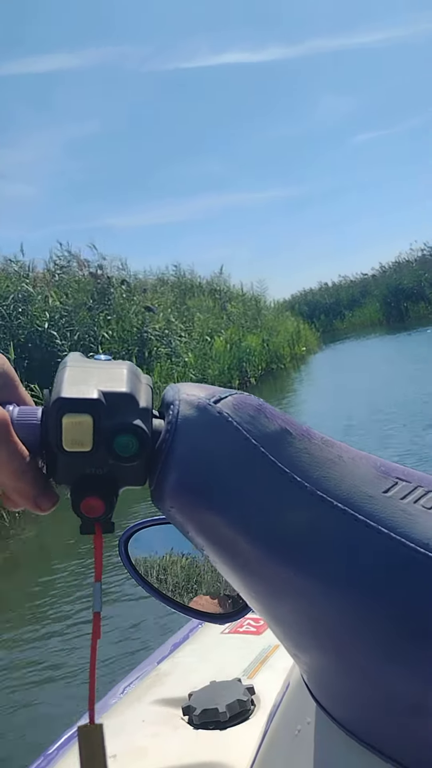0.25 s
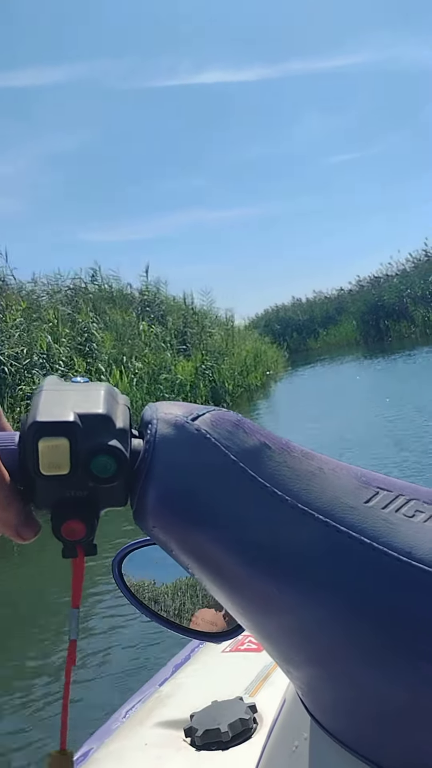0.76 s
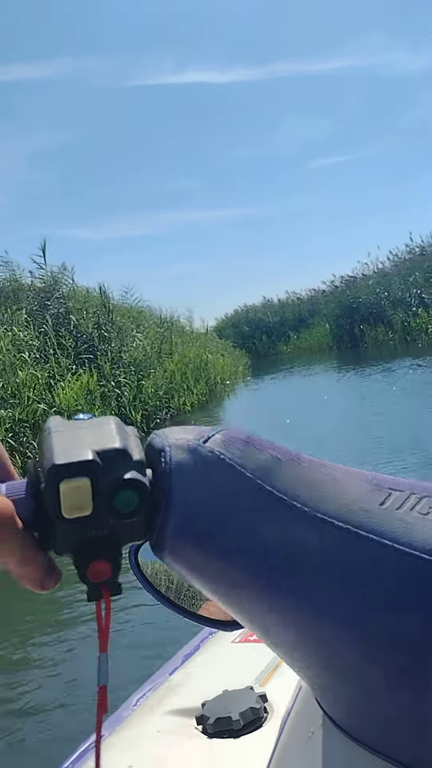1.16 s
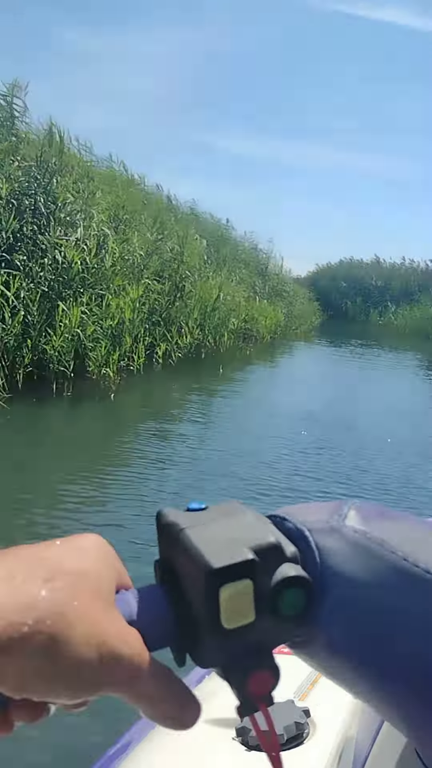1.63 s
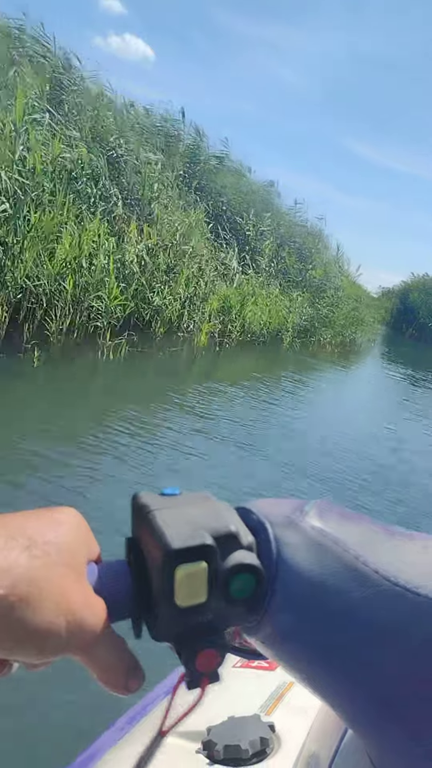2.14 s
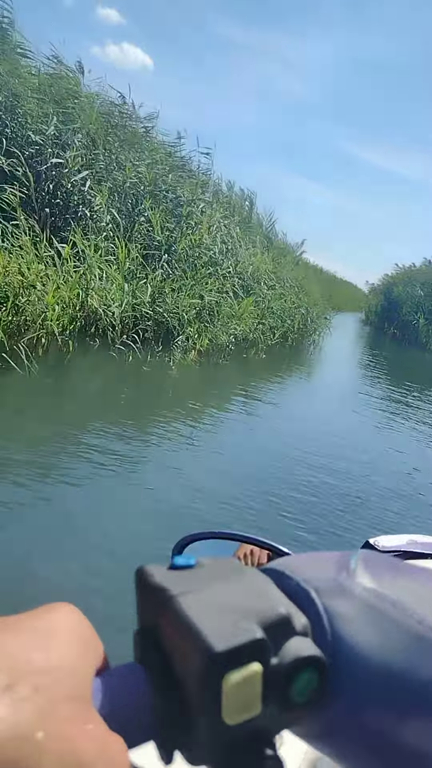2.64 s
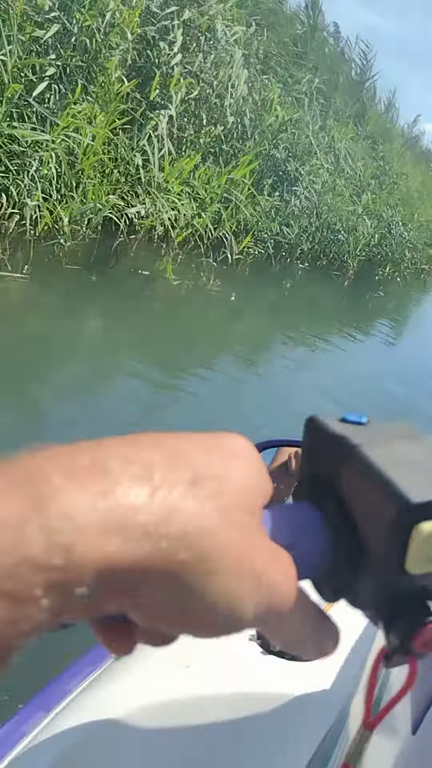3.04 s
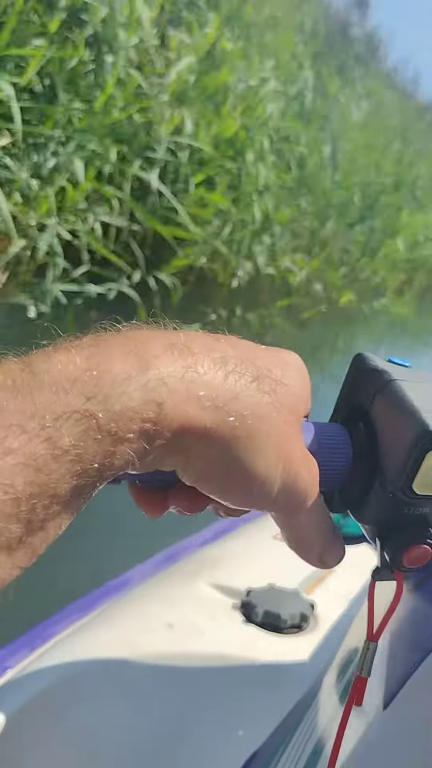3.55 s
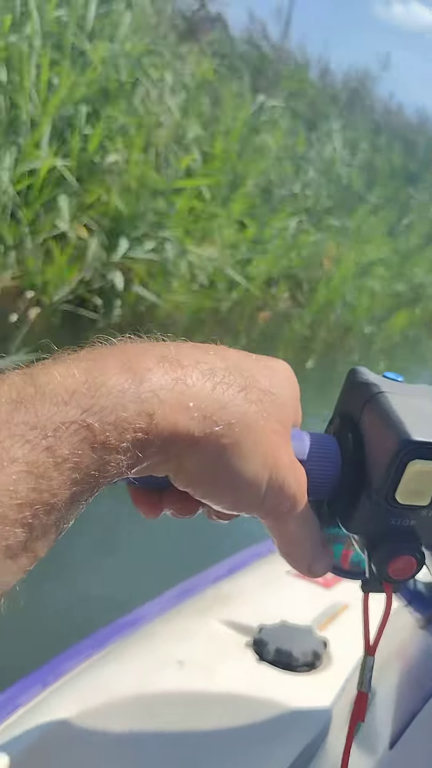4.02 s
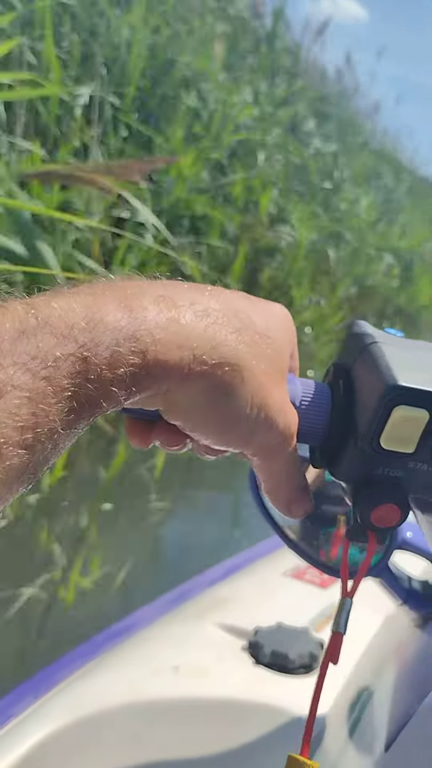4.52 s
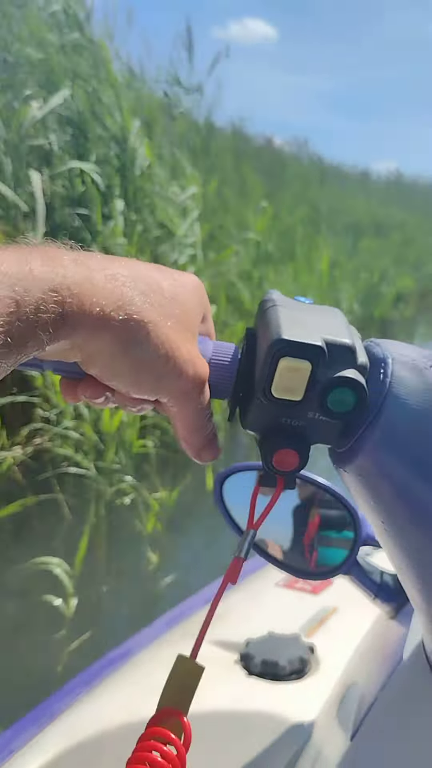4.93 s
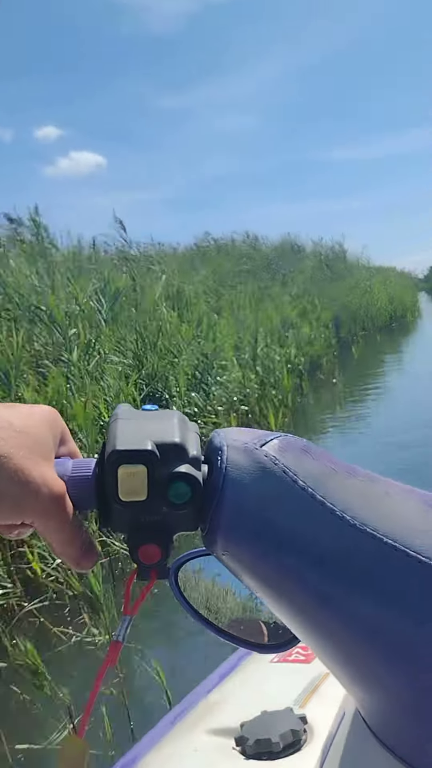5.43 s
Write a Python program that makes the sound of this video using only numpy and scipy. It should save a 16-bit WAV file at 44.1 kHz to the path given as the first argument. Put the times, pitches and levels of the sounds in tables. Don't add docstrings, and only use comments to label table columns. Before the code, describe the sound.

Close on board a small two-stroke jet boat, the engine drones low, jumps to a raspy higher note, sags, then surges again and stays high. Low air thumps buffet the hull, water spray builds in the second half, and faint ticks hit the deck near the end. Open marsh, hand-held stereo microphone, brighter and mostly louder on the right.

```python
import sys
import numpy as np
from scipy import signal
from scipy.fft import rfft, irfft, next_fast_len
from scipy.io import wavfile
from scipy.ndimage import uniform_filter1d

SR = 44100
rng = np.random.default_rng(int(sys.argv[2]) if len(sys.argv) > 2 else 0)


def to_wav(sig):
    pcm = np.clip(np.atleast_2d(sig), -1, 1) * 32767
    pcm = np.round(pcm).astype(np.int16)
    wavfile.write(sys.argv[1], SR, pcm.T)


def makeup_ratio(level_db):
    decades = np.asarray(level_db, float) / 20
    return 10 ** decades


N = 250488


def at_hz(points, hz, column=1):
    points = np.array(points)
    return np.interp(np.log(np.maximum(hz, 1)), np.log(points[:, 0]), points[:, column])


def in_time(rows):
    s, *columns = np.transpose(rows)
    return [np.interp(np.arange(N) / SR, s, c) for c in columns]


def bumps(rows, width_s):
    s, *columns = np.transpose(rows)
    bells = np.exp(-((np.arange(0, N, 64) / SR - s[:, None]) / width_s) ** 2)
    return [np.interp(np.arange(N) / 64, np.arange(bells.shape[1]), c @ bells) for c in columns]


def rms_one(x):
    return x / np.sqrt(np.mean(x ** 2) + 1e-20)


def drift(rate_hz):
    r = np.exp(-2 * np.pi * rate_hz * 40 / SR)
    noise = rng.standard_normal(N // 40 + 2002)
    slow = signal.lfilter([1], [1, -2 * r, r * r], noise)[2000:]
    slow = rms_one(slow - slow.mean())
    return np.interp(np.arange(N) / 40, np.arange(len(slow)), slow)


def coloured(x, spectrum):
    size = next_fast_len(N + SR // 2)
    hz = np.arange(size // 2 + 1) * SR / size
    octaves_below = np.log2(spectrum[0][0] / np.maximum(hz, 1))
    octaves_above = np.log2(np.maximum(hz, 1) / spectrum[-1][0])
    outside = np.maximum(np.maximum(octaves_below, octaves_above), 0)
    gain = makeup_ratio(at_hz(spectrum, hz) - 40 * outside)
    return rms_one(irfft(rfft(x, size) * gain, size)[:, :N])


def resonance(x, hz, width_hz):
    r = np.exp(-np.pi * width_hz / SR)
    top = np.array([1, 0, -1]) * (1 - r * r) / 2
    return signal.lfilter(top, [1, -2 * r * np.cos(2 * np.pi * hz / SR), r * r], x)


def rattle(shake, modes, patchy_db):
    rings = 0
    for hz, width_hz, db in modes:
        ring = resonance(resonance(shake, hz, 1.7 * width_hz), hz, 1.7 * width_hz)
        rings = rings + makeup_ratio(db + patchy_db * drift(12)) * ring
    return rms_one(rings)


def gated(turn, depth, patchy_db):
    uneven_turn = turn + 0.28 * drift(18)
    gate = np.exp(depth * np.cos(uneven_turn)) * makeup_ratio(patchy_db * drift(16))
    return gate * rng.standard_normal((2, N))


def grains(spread_db, patchy_db):
    size_db = spread_db * np.minimum(rng.exponential(1, N), 5)
    return makeup_ratio(size_db + patchy_db * drift(32)) * rng.standard_normal((2, N))


def shaft_speed():
    # (time [s], speed [turns/s])
    throttle = [(0.0, 64.9), (0.39, 65.9), (0.955, 71.1), (1.04, 74.8), (1.31, 103.4), (1.45, 106.5),
                (1.675, 107.1), (2.1, 84.9), (2.625, 72.7), (2.835, 104.6), (2.96, 107.3), (3.385, 108.5),
                (3.605, 101.1), (3.905, 96.2), (4.455, 96.6), (4.81, 91.2), (4.965, 109.3), (5.68, 110.9)]
    # (time [s], speed gained [turns/s])
    slips = [
        (.62, .5),
        (1.82, -1.1),
        (1.94, 1),
        (2.62, .8),
        (2.72, -1.5),
        (2.8, .9),
        (4.65, -.6),
        (4.97, -.8),
    ]
    inertia_s = .05
    smooth = uniform_filter1d(in_time(throttle)[0], size=int(inertia_s * SR), mode="nearest")
    return smooth + bumps(slips, .045)[0]


def hull_db(hz):
    # (pitch [Hz], width [Hz], level [dB])
    resonances = [(70, 71, 2), (278.3, 31, 4.5), (396.4, 76, 5), (463.2, 33, 1.5), (510.6, 75, -2),
                  (647.5, 43, -13.5), (719.8, 48, -10), (869, 18, -10), (920, 40, -6), (1125, 10, -11.5),
                  (1267, 100, -11.5), (1487, 160, -18.5), (2150, 81, -8.5), (2290, 80, -16.5)]
    power = 0.0057
    for top, width_hz, db in resonances:
        power = power + makeup_ratio(2 * db) / (1 + (2 * (hz - top) / width_hz) ** 2) ** 2
    return 10 * np.log10(power)


def drone(speed, turn):
    # (time [s], level [dB])
    effort = [(0, 1), (.6, -1), (1.1, -1.5), (1.45, 1), (1.75, -0.5), (1.95, 2.5), (2.4, 1), (2.75, -1),
              (2.9, 1), (3.4, 0), (3.55, -1.5), (3.8, -0.5), (4.5, 0.5), (4.8, 0), (5.3, 0), (5.68, -1)]
    # (speed [turns/s], order 2 [dB], order 3 [dB], order 4 gain [dB],
    # order 5 [dB], other orders [dB])
    by_speed = [(69, -35.5, -18.5, 2, -48, -35.5), (67.4, -40.5, -23.5, 1, -50.5, -39.5),
                (68.6, -32.5, -26, 6, -37, -33), (72.6, -29, -28.5, 3.5, -38, -31.5),
                (79.8, -33.5, -21, 4, -26.5, -32.5), (85.8, -35, -16, 4.5, -33, -32.5),
                (100.4, -23.5, -14.5, 3, -33.5, -33), (96.8, -25.5, -15, -8.5, -40, -29),
                (106.8, -23.5, -15, 5.5, -26.5, -30), (106.5, -24.5, -16, -7.5, -31, -33.5),
                (112.2, -17.5, -21, -7, -30.5, -24)]
    # (order [number], level [dB])
    pattern = [(1, 3.5), (4, -2), (6, 4), (7, 5.5), (8, 2), (9, -0.5), (10, 3), (11, 2), (12, -1.5),
               (13, -2), (14, 1), (15, -6.5), (16, 0), (17, -0.5), (18, -6.5), (19, -4.5), (20, -2),
               (21, -6.5), (22, -5.5)]
    # (order [number], start [s], end [s])
    swells = [(1, 1.1, 1.5), (1, 2.78, 3.06), (2, 2.8, 3.9), (5, 3.5, 4.85), (8, -1, .6), (7, 1.12, 1.9),
              (11, 1.95, 2.3), (8, 1.25, 1.72), (8, 1.9, 2.5), (8, 2.8, 3.4), (9, 4.85, 7), (10, -1, .52),
              (10, .54, 1.05), (10, 1.15, 1.29), (4, 1.3, 1.56), (10, 2.3, 2.75), (10, 4.9, 7),
              (11, -1, .66), (7, 1.98, 2.4), (11, 1.05, 1.21), (11, 1.3, 1.8), (2, 1.72, 1.95),
              (12, 1.26, 1.62), (13, .68, 1.05), (14, 1.68, 2.0), (14, 3.37, 3.75), (14, 3.7, 4.6),
              (15, 3.4, 5.0), (17, 1.6, 4.9), (21, .6, 1.05)]
    swells_db = [-13, 6, -7, -2.5, 1.5, -4.5, -7.5, 8.5, -9.5, 4.5, 9.5, -14, 9, 12.5, -10, 7.5, 7.5, 10.5,
                 3.5, 5.5, 8.5, -8, 7.5, 7.5, 9.5, 13.5, 9, 12, 4, 12]
    t, step = np.arange(N) / SR, 64
    effort_db = in_time(effort)[0]
    turns, *columns = np.transpose(by_speed)
    second_db, third_db, fourth_db, fifth_db, rest_db = [np.interp(speed, turns, c) for c in columns]
    quickening = np.gradient(np.log2(speed)) * SR
    rest_db = rest_db + effort_db + 0.5 * quickening
    levels_db = {2: effort_db + second_db, 3: effort_db + third_db}
    levels_db[5] = effort_db + fifth_db + 2.5 * quickening + 0.87 * drift(16)
    for k, db in pattern:
        through_hull_db = np.repeat(hull_db(k * speed[::step]), step)[:N]
        levels_db[k] = rest_db + db + through_hull_db + 1.1 * drift(15)
    levels_db[4] += fourth_db
    for (k, start, end), db in zip(swells, swells_db):
        fade = np.clip(np.minimum(t - start, end - t) / .08, 0, 1)
        levels_db[k] = levels_db[k] + db * fade
    waver, out = .018 * drift(20), np.zeros(N)
    for k, level_db in levels_db.items():
        gain = uniform_filter1d(makeup_ratio(level_db + .7 * drift(21)), size=256)
        delay = -.2 * k * k + .1 * rng.uniform(0, 2 * np.pi)
        out += np.sqrt(2) * gain * np.cos(k * (turn + waver + 2) + delay)
    return out


def engine_noise_levels(octaves):
    # (time [s], roar [dB], rasp [dB], rattle [dB])
    snaps = [
        (1.17, 2.5, 6, 1),
        (1.72, -1, 7, 1),
        (2.2, 3, 4.5, 1),
        (2.78, 4, 6.5, 0.5),
        (3.469, 0, 0.5, 4.5),
        (4.3, 0, 3, 3.5),
        (4.62, -2, 4, 2),
        (4.94, 1, 5.5, 1),
    ]
    t = np.arange(N) / SR
    fall = 0.22 * t
    held = np.maximum.accumulate(octaves + fall) - fall
    roar_snap_db, rasp_snap_db, rattle_snap_db = bumps(snaps, .12)
    roar_db = -39 + 3.34 * held + 0.67 * t + roar_snap_db
    rasp_db = -46 + 13.1 * held + 0.62 * t + rasp_snap_db
    rattle_db = -47 + 11.3 * held + 0.18 * t + rattle_snap_db
    return roar_db, rasp_db, rattle_db


def exhaust_roar(turn, level_db):
    # (pitch [Hz], level per Hz [dB])
    roar_tone = [(82, -43), (140, -3), (203, -8), (263, -6), (311, -8.5), (341, -9), (471, -7.5),
                 (614, -19.5), (893, -14.5), (1020, -17.5), (1330, -56.5), (2240, -120)]
    return makeup_ratio(level_db + 6) * coloured(gated(turn, depth=0.08, patchy_db=1.94), roar_tone)


def intake_rasp(turn, level_db):
    # (pitch [Hz], width [Hz], level [dB])
    box_modes = [(1178, 160, 1), (1348, 148, 0.5), (1602, 180, -7.5)]
    return makeup_ratio(level_db - 2) * rattle(gated(turn, depth=0.3, patchy_db=0.94), box_modes, patchy_db=2.04)


def casing_rattle(turn, level_db):
    # (pitch [Hz], width [Hz], level [dB])
    casing_modes = [(2106, 100, 0.5), (2216, 230, -5)]
    return makeup_ratio(level_db - 0.6) * rattle(gated(turn, depth=0.23, patchy_db=0.6), casing_modes, patchy_db=0.6)


def jet_pump(turn, octaves):
    # (pitch [Hz], width [Hz], level [dB])
    pump_modes = [(4620, 180, 2.5), (5600, 250, -5)]
    hiss = rattle(gated(turn, depth=0.16, patchy_db=0.9), pump_modes, patchy_db=-1.5)
    return makeup_ratio(-79.5 + 30.5 * octaves) * hiss


def air_rumble():
    # (time [s], level [dB])
    buffet = [(0, -25.5), (.45, -35), (.95, -26.5), (1.15, -38.5), (1.42, -29.5), (1.9, -22), (2.5, -15),
              (2.72, -19.5), (2.98, -24.5), (3.1, -15), (3.55, -16), (4.2, -17.5), (4.6, -27), (4.75, -21),
              (5.2, -18), (5.68, -15.5)]
    # (time [s], level [dB])
    brief_swells = [(.2, 3.5), (.98, 9.5), (1.06, 7.5), (1.85, 4), (2.34, 1), (2.4, -5.5), (2.59, 6.5), (3.29, 2),
                    (3.42, -6), (3.54, 3), (4.05, 4.5), (4.18, 2), (4.33, -8), (4.73, 8.5), (4.81, -5.5),
                    (5.02, 6.5), (5.47, 2), (5.6, -9)]
    # (pitch [Hz], level per Hz [dB])
    rumble_tone = [(12, -44), (20, -13), (70, 9), (106, 4.5), (162, -13.5), (190, -28), (250, -47.5),
                   (420, -120)]
    level_db = in_time(buffet)[0] + bumps(brief_swells, 0.021)[0]
    return makeup_ratio(level_db) * coloured(rng.standard_normal((2, N)), rumble_tone)


def water_levels():
    # (time [s], wash level [dB])
    thrown = [(0, -60.5), (.5, -56), (1.1, -58), (1.65, -50.5), (2.07, -40.5), (2.36, -50), (2.5, -49.5),
              (2.8, -49.5), (3.26, -42), (3.9, -41), (4.4, -39), (4.7, -36), (5.3, -36.5), (5.68, -40)]
    # (time [s], level [dB])
    splashes = [(2.33, 9), (2.95, 1.5), (3.29, 3.5), (3.95, 5.5), (4.14, 3.5), (4.41, 4.5), (4.66, 0.5),
                (4.97, 3.5), (5.15, 4), (5.26, 4), (5.44, 4), (5.55, 2.5)]
    return in_time(thrown)[0], bumps(splashes, 0.044)[0]


def footwell_wash(wash_db, splash_db):
    # (pitch [Hz], width [Hz], level [dB])
    footwell_modes = [(2880, 270, 2), (2920, 230, -8), (2606, 240, -5)]
    ring = rattle(grains(spread_db=1.5, patchy_db=-0.53), footwell_modes, patchy_db=-4.4)
    return makeup_ratio(wash_db + 0.62 * splash_db) * ring


def spray_hiss(wash_db, splash_db):
    # (pitch [Hz], level per Hz [dB])
    spray_tone = [(2000, -26), (3400, -5), (3500, -2.5), (3790, 6), (4650, -4.5), (5290, 3.5), (6370, -19),
                  (7200, -29), (9360, -48), (15800, -120)]
    level_db = -49 + (wash_db + 40) + splash_db
    return makeup_ratio(level_db + 1) * coloured(grains(spread_db=3.5, patchy_db=1.2), spray_tone)


def mist_hiss(wash_db, splash_db):
    # (pitch [Hz], level per Hz [dB])
    mist_tone = [(3760, -32), (6400, 1), (7340, 1), (8520, -10), (9010, -12.5), (9850, -2.5), (12100, -8),
                 (14000, -4), (14700, -11.5), (15600, -23.5)]
    gathering_db = 0.6 * (np.arange(N) / SR - 3)
    level_db = -65 + 0.51 * (wash_db + 40) + .3 * splash_db + gathering_db
    return makeup_ratio(level_db + 0.7) * coloured(grains(spread_db=5, patchy_db=-0.7), mist_tone)


def deck_ticks():
    # (time [s], peak level [dB], pitch [Hz])
    hits = [
        (3.7094, -33, 2380),
        (4.428, -32, 3050),
        (4.663, -30, 2870),
        (4.8143, -31, 3040),
        (4.9076, -27, 3060),
        (4.9785, -29, 3000),
        (5.0323, -31, 3120),
        (5.2454, -29, 3070),
        (5.4274, -14.5, 2800),
    ]
    out, t = np.zeros(N), np.arange(300) / SR
    for s, db, hz in hits:
        at = round(s * SR)
        burst = np.exp(-((t - .0015) / 0.0007) ** 2) * np.sin(2 * np.pi * hz * t)
        out[at:at + 300] += makeup_ratio(db + 2.5) * burst
    return out


def ports(direct, diffuse):
    # (pitch [Hz], left minus right [dB], right leads by [radians])
    low_balance = [(45, 3, .7), (85, 1, .8), (200, -3.5, .9), (290, -7, .9), (330, -10.5, .55),
                   (390, -8.5, -.4), (440, -8, -1.3), (535, -3, -2.05), (640, 6, -1.8), (760, 1, -1.7),
                   (890, 1.5, -1.5), (990, -5, -.6)]
    # (pitch [Hz], left minus right [dB])
    body_shade = [(990, -5), (1150, -13), (1380, -15), (1750, -9), (2080, -17), (2500, -14), (3000, -19),
                  (3500, -9), (4500, -14), (5600, -17), (6400, -8), (7100, -14), (8400, -5), (9900, -15),
                  (14000, -15)]
    # (pitch [Hz], share [0-1])
    likeness = [(60, .96), (500, .75), (1000, .3), (1800, .08), (3000, .12), (5000, .04), (12000, .02)]
    size = next_fast_len(N + SR // 2)
    hz = np.arange(size // 2 + 1) * SR / size
    treble_hz, treble_lead_s = body_shade[0][0], .0011
    balance_db = np.where(hz > treble_hz, at_hz(body_shade, hz), at_hz(low_balance, hz))
    lead = at_hz(low_balance, hz, column=2)
    lead = lead + 2 * np.pi * treble_lead_s * np.maximum(hz - treble_hz, 0)
    right = makeup_ratio(-balance_db) * np.exp(1j * lead)
    alike = np.clip(at_hz(likeness, hz), 0, 1)
    fade_in = np.clip(np.arange(-400, N + 400) / 400 + 1, 0, 1)
    fade_out = np.clip(np.arange(N + 800, 0, -1) / 400, 0, 1)
    sounds = np.pad(np.vstack([direct, diffuse]), ((0, 0), (400, 400)), "reflect", reflect_type="odd")
    tone, near, far = rfft(sounds * (fade_in * fade_out), size)
    left_in = tone + np.sqrt(alike) * near + np.sqrt(1 - alike) * far
    right_in = (tone + near) * right
    both = np.array([left_in, right_in]) * 2 / np.abs(1 + right)
    return irfft(both, size)[:, 400:N + 400]


def scene():
    speed = shaft_speed()
    turn = 2 * np.pi * np.cumsum(speed) / SR
    octaves = np.log2(speed / 65)
    roar_db, rasp_db, rattle_db = engine_noise_levels(octaves)
    wash_db, splash_db = water_levels()
    engine = exhaust_roar(turn, roar_db) + intake_rasp(turn, rasp_db) + casing_rattle(turn, rattle_db)
    engine = engine + jet_pump(turn, octaves)
    water = footwell_wash(wash_db, splash_db) + spray_hiss(wash_db, splash_db) + mist_hiss(wash_db, splash_db)
    heard = ports(drone(speed, turn), engine + air_rumble() + water)
    return heard + deck_ticks() * makeup_ratio([[-20], [6]])


def roll_off(x):
    return signal.sosfilt(signal.butter(12, 15710, fs=SR, output="sos"), x)


def record(dry):
    hiss = makeup_ratio(-80) * rng.standard_normal(N)
    mix = 1.431 * np.tanh((dry + hiss) / 1.544)
    return roll_off(mix)


dry = scene()
out = record(dry)
to_wav(out)
```